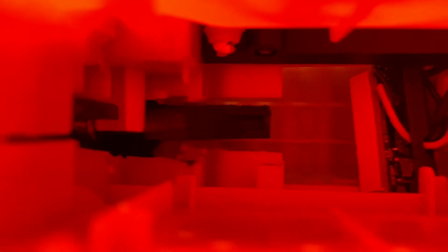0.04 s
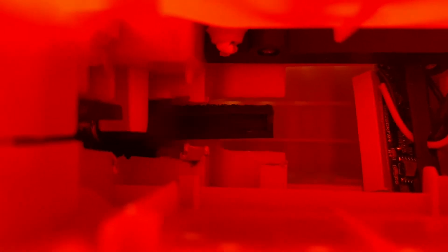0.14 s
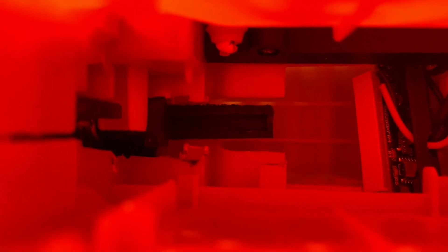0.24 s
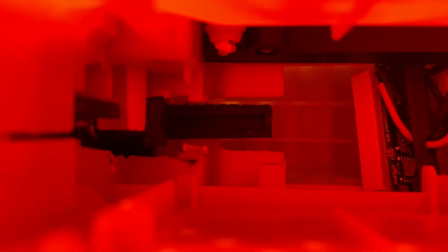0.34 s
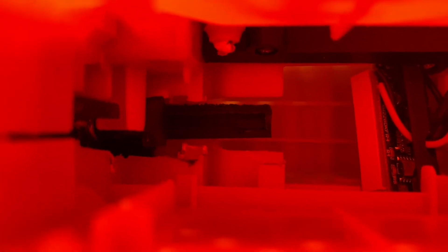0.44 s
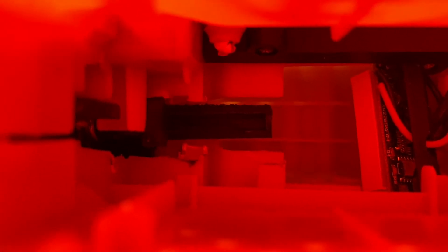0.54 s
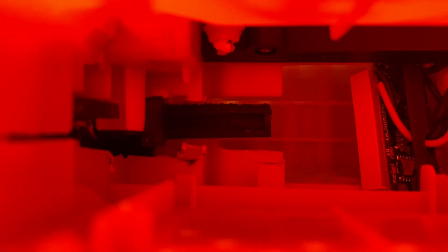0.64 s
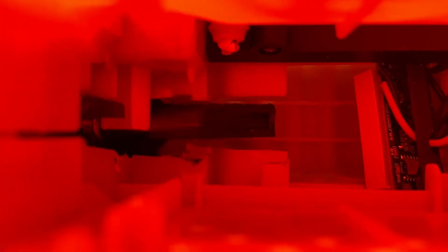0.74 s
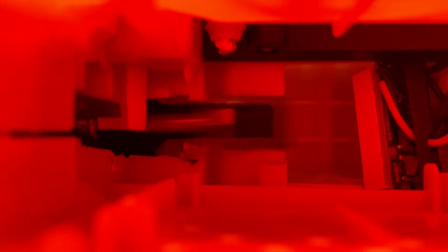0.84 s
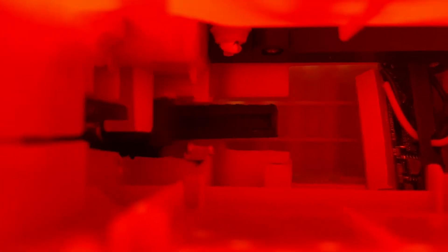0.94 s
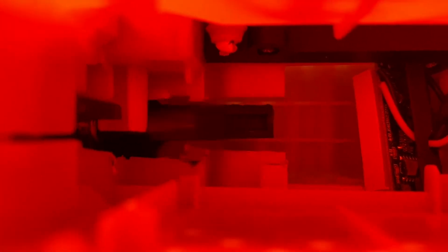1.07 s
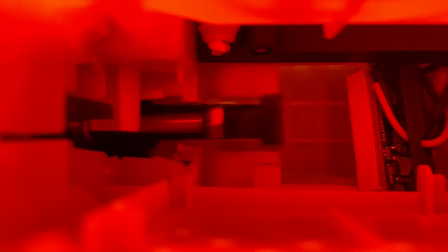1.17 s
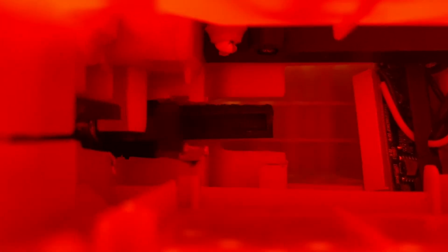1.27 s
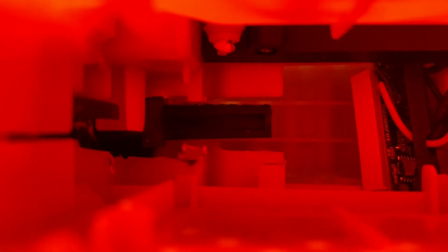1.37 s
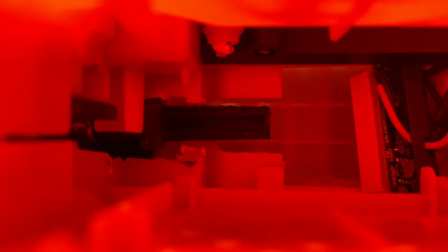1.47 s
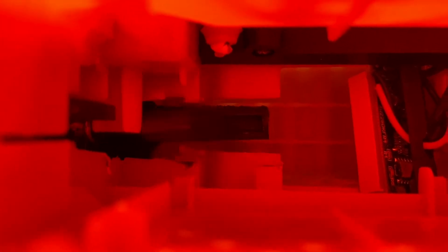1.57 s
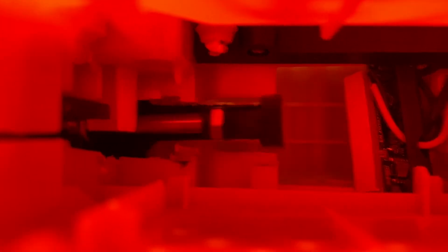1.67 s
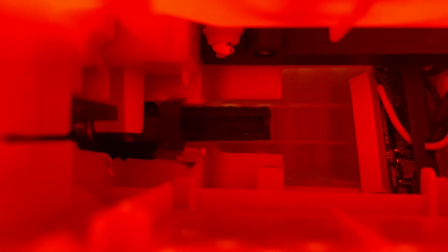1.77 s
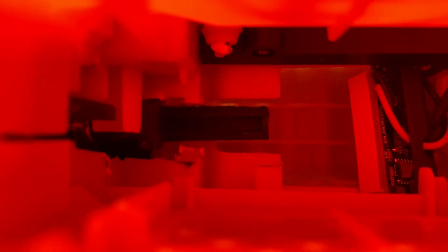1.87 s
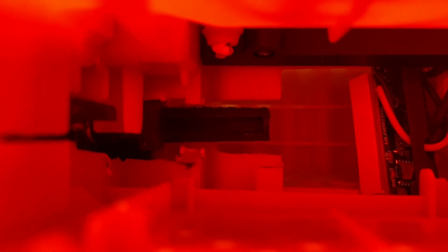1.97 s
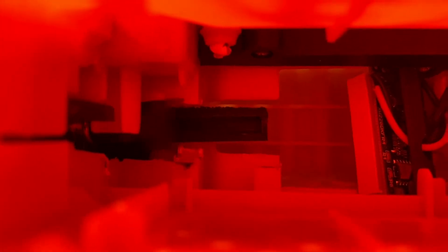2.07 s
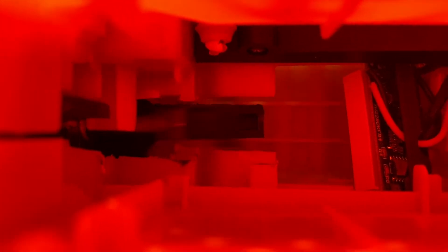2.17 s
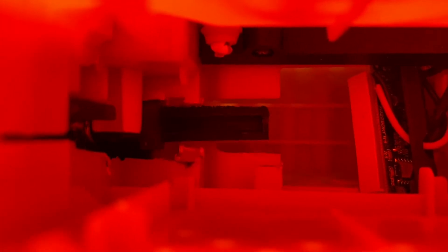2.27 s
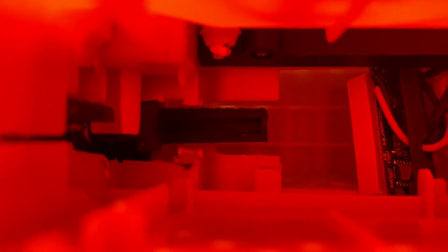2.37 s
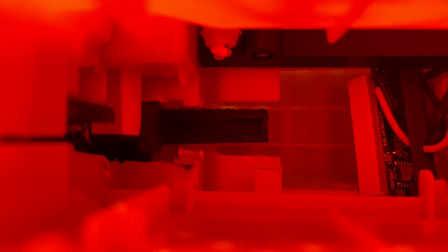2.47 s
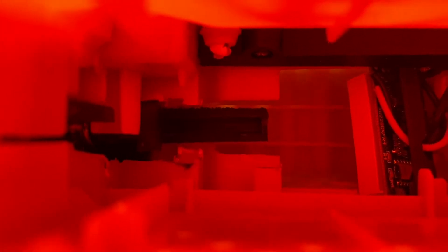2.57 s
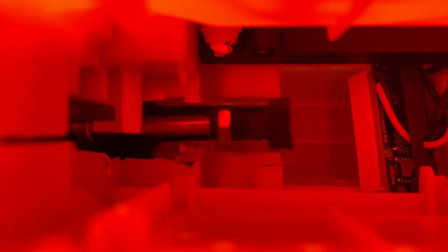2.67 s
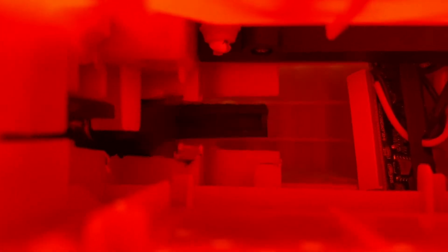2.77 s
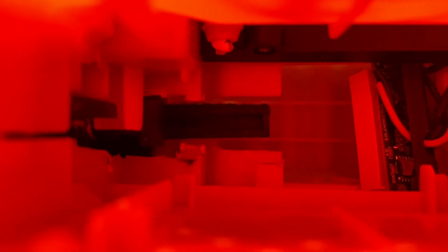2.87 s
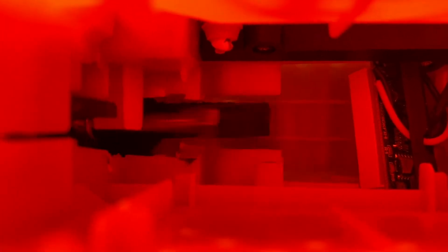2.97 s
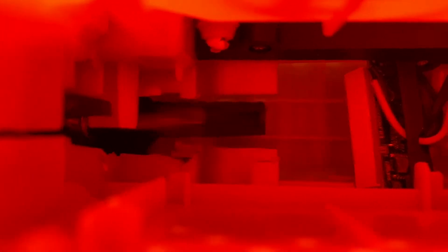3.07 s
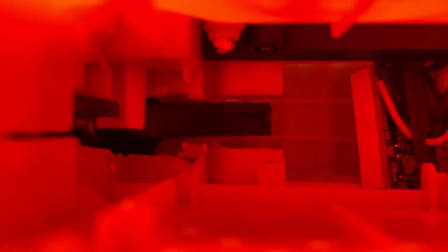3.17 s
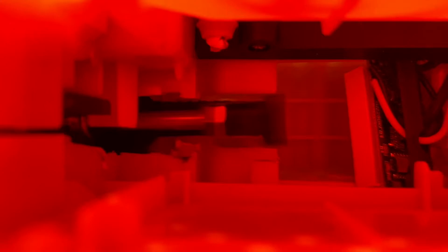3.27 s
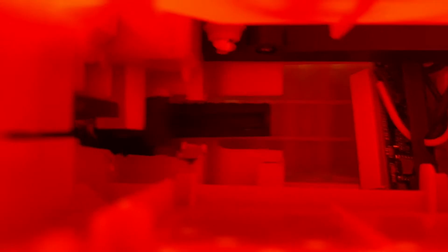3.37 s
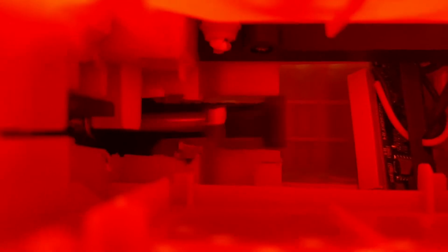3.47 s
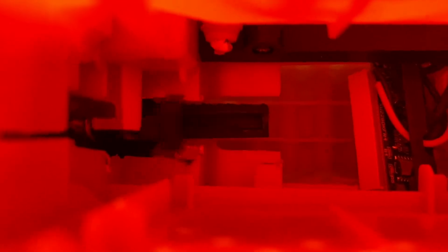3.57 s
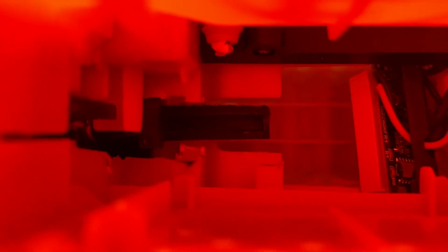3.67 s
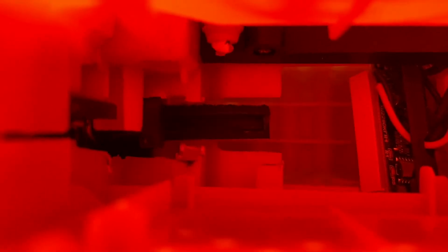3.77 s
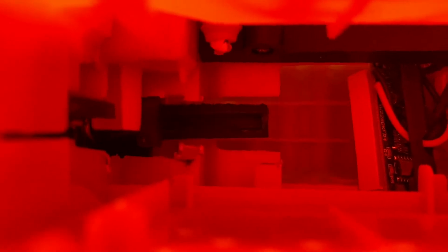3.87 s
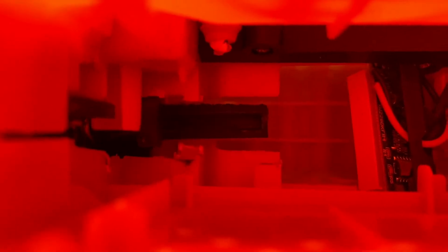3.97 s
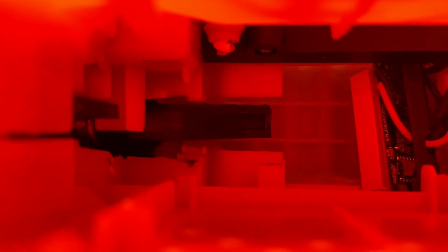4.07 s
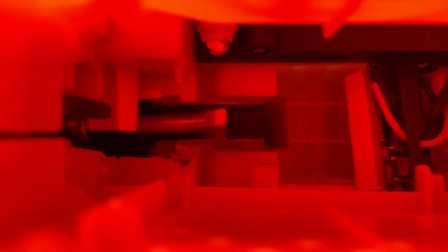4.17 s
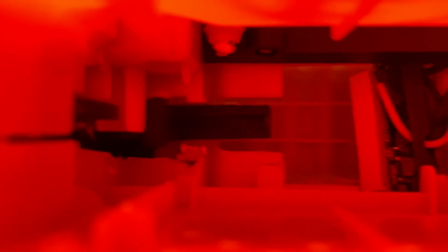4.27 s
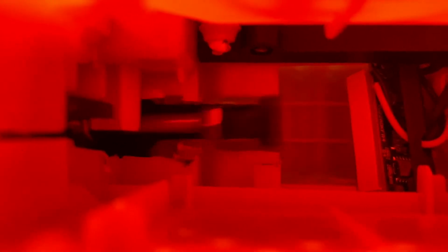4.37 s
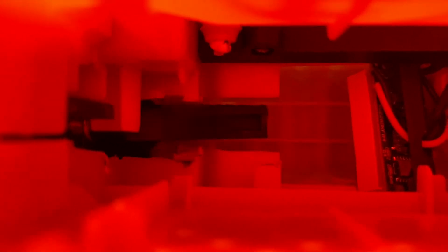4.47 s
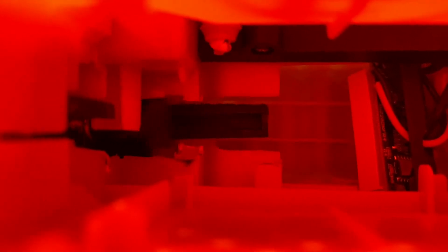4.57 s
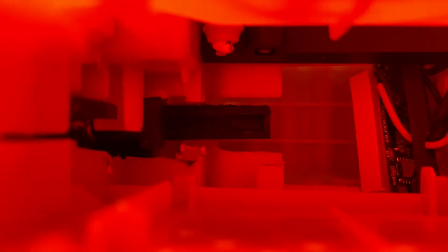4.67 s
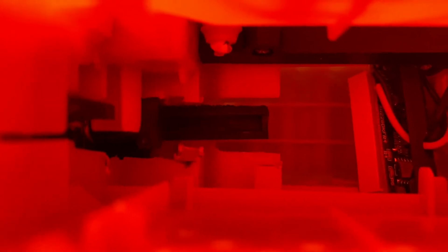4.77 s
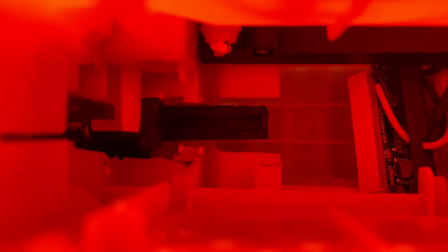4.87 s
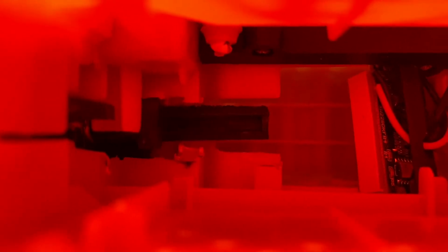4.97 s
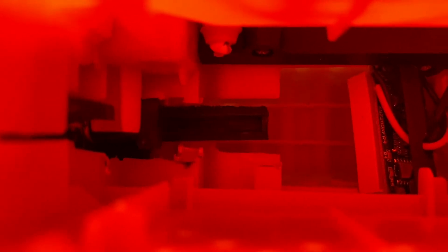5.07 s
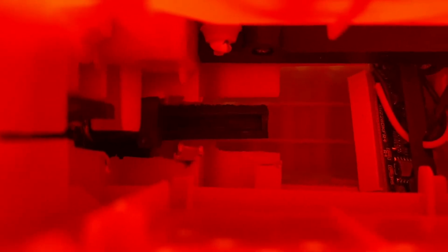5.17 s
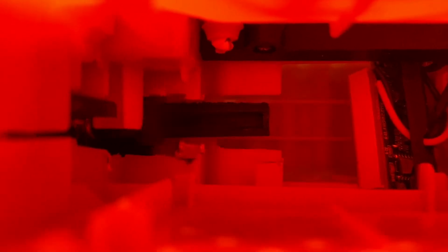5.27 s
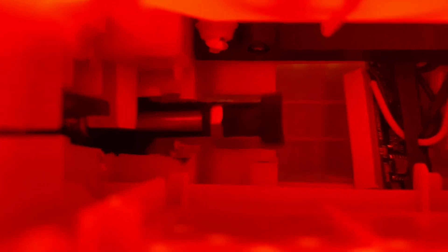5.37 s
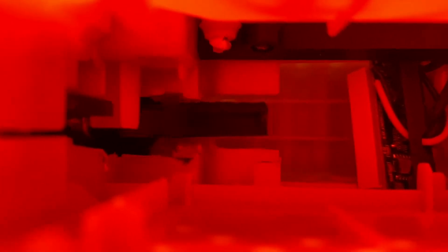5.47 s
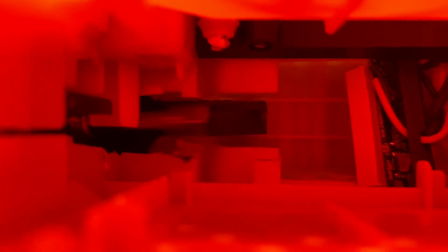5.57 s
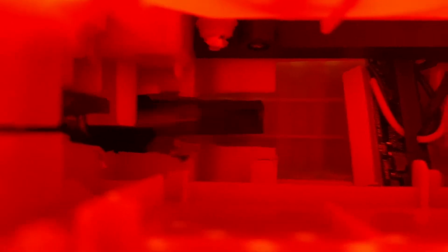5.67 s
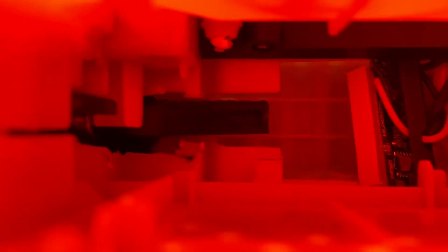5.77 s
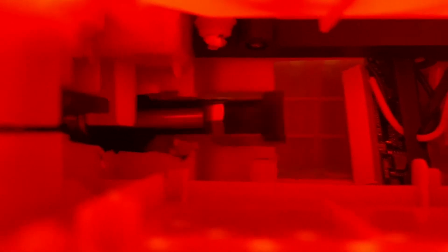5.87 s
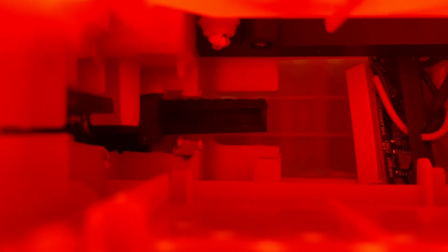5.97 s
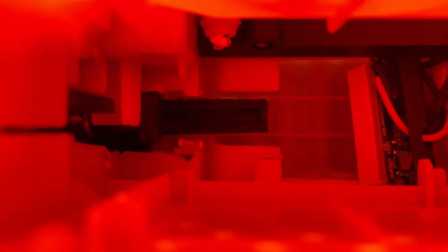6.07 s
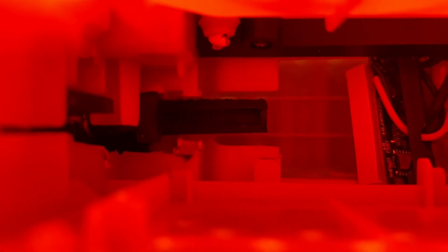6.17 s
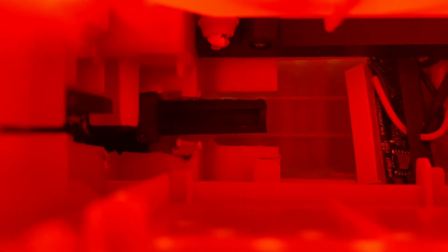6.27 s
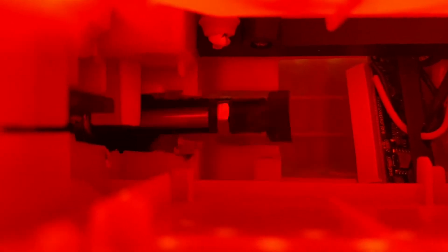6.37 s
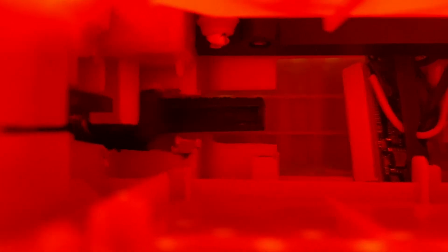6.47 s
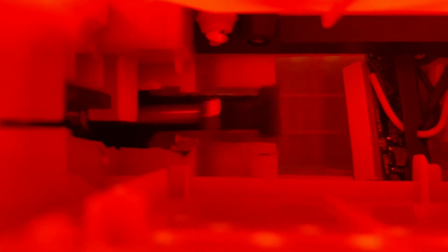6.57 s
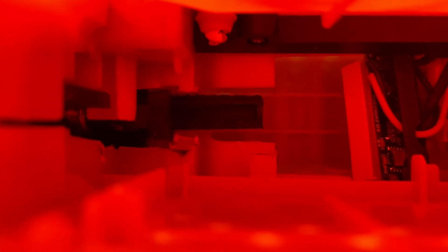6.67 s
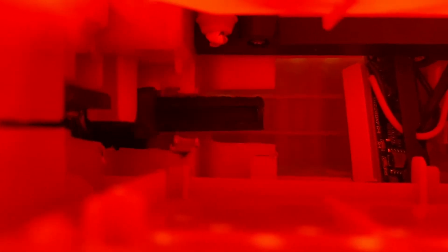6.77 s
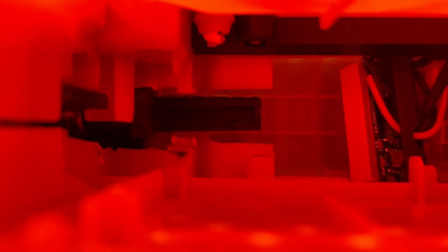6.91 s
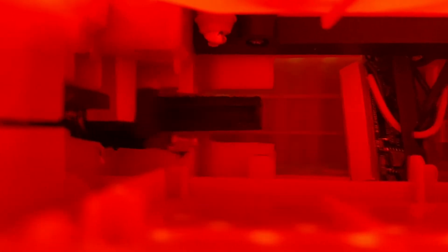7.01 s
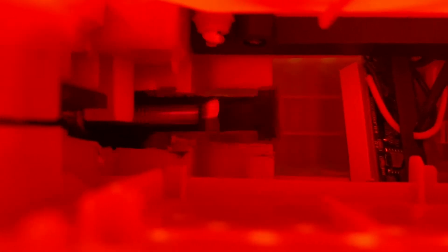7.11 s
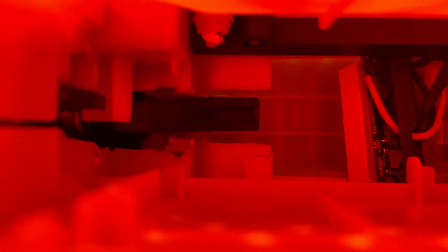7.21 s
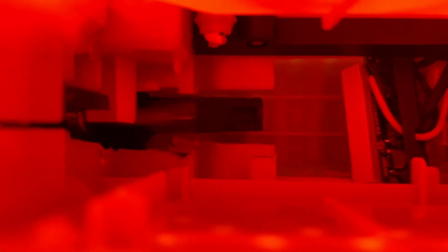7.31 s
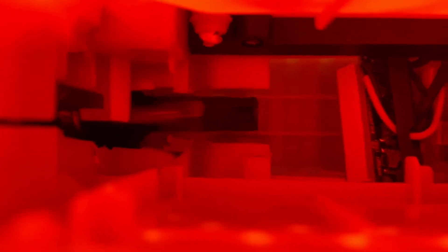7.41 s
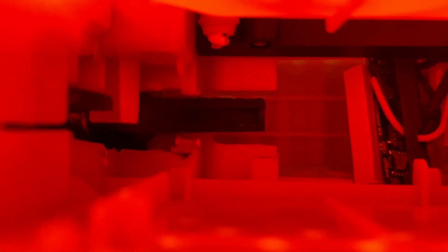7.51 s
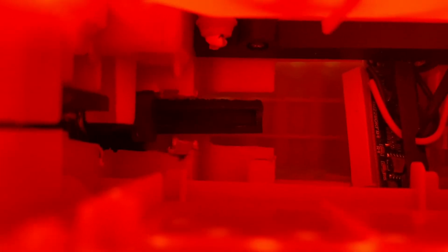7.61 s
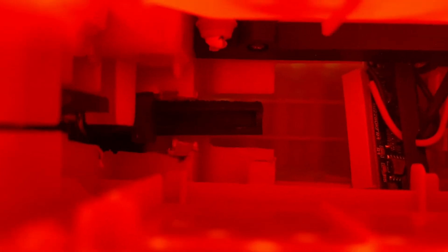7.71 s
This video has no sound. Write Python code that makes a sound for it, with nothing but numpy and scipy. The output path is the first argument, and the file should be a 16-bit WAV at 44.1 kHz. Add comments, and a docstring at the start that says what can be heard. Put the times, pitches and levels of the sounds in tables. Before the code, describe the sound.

In a small room, a toy blaster's solenoid plunger clatters right next to the microphone, slamming forward and springing back so the plastic shell rings and loose parts rattle. It starts with stuttering bursts of just a few strokes, then moves to rapid runs of about half a second. The loudest clacks distort a little. In the short pauses the trigger ticks softly and hands rumble faintly on the shell.

```python
"""A solenoid pusher hammers about 16 times a second, in short bursts, inside a toy blaster's open shell. On
each stroke the plunger scrapes forward, slams on its stop and is thrown back by its spring onto a soft bumper,
where it chatters. The hits ring the plastic shell and the spring, and shake loose parts. The trigger ticks
between bursts and hands rumble on the shell. The slams are so loud that their peaks flatten; a small room
answers."""
import sys
import numpy as np
from scipy import signal
from scipy.fft import rfft, irfft, next_fast_len
from scipy.io import wavfile

SR = 44100
rng = np.random.default_rng(int(sys.argv[2]) if len(sys.argv) > 2 else 0)


def log_audio(samples):
    """Write samples as a 16-bit WAV file to the path given in sys.argv[1]."""
    # one column per channel
    frames = np.atleast_2d(samples).T
    # limit to full scale, then quantise
    limited = np.clip(frames, -1, 1)
    pcm = np.round(limited * 32767).astype(np.int16)
    wavfile.write(sys.argv[1], SR, pcm)


N = 341525
SIZE = next_fast_len(N + SR // 3, real=True)
HZ = np.fft.rfftfreq(SIZE, 1 / SR)
T = np.arange(SR // 7) / SR  # time axis of one contact
CYCLE_S = .0633  # stroke to stroke within a burst

# Trigger pulls (event levels are relative: each layer adds its own gain):
# first slam t/s, stroke count, first cycle/s, clack/dB, thump/dB, bumper thud/dB, switch click/dB
BURSTS = [(-0.036, 2, .0845, -10, -12, -16, -50), (0.689, 4, .087, -10, -11.5, -16, -35),
          (1.081, 3, .0808, -8.5, -11, -16, -45), (1.582, 2, .0835, -9, -11, -13, -42),
          (2.094, 1, 0.085, -10.5, -11.5, -14, -38.5), (2.662, 1, 0.086, -9.5, -11, -14.5, -41.5),
          (2.932, 10, 0.084, -9, -12, -12.5, -46.5), (4.024, 8, .0845, -9.5, -11.5, -13.5, -51),
          (5.218, 11, 0.083, -9.5, -12, -14, -44), (6.354, 4, 0.083, -10, -12.5, -15, -48),
          (6.952, 9, .082, -10, -12, -13.5, -47)]


def amp(db):
    """Decibels to gain."""
    return 10 ** (np.asarray(db) / 20)


def unit(x):
    """Scale to rms 1."""
    return x / np.sqrt(np.mean(x ** 2) + 1e-20)


def along(points, hz):
    """Read a curve of (f/Hz, value) points on a log frequency axis."""
    f, v = np.transpose(points)
    return np.interp(np.log(hz + 1), np.log(f + 1), v)


def filtered(x, response):
    """Pass x through a frequency response."""
    return irfft(rfft(x, SIZE) * response, SIZE)[..., :N]


def colour(points):
    """Minimum-phase EQ through (f/Hz, level/dB) points."""
    cepstrum = irfft(np.log(amp(along(points, HZ))), SIZE)
    cepstrum[1:SIZE // 2] *= 2
    cepstrum[SIZE // 2 + 1:] = 0
    return np.exp(rfft(cepstrum))


def resonances(modes):
    """Response of a bank of damped modes, alternating in polarity."""
    return 1j * HZ * sum((-1) ** k * amp(db) * width / (hz ** 2 - HZ ** 2 + 1j * HZ * width)
                         for k, (hz, width, db) in enumerate(modes))


def add(track, s, piece):
    """Mix a piece into a track at s seconds."""
    start = int(round(s * SR))
    piece = piece[..., max(-start, 0):max(N - start, 0)]
    start = max(start, 0)
    track[..., start:start + piece.shape[-1]] += piece


def fade(attack, t60):
    """Envelope of one contact: quick rise, exponential decay."""
    return (1 - np.exp(-T / attack)) * amp(-60 * T / t60)


def settle(attack, duration):
    """Envelope of a bouncing contact: it keeps up for a while, then stops quickly."""
    return (1 - np.exp(-T / attack)) * np.exp(-(T / duration) ** 2)


def grit(count, alike, spiky_db):
    """Stereo noise of dense, uneven tiny contacts; alike is the share of power common to both sides."""
    common, left, right = rng.standard_normal((3, count))
    knots = rng.standard_normal(count // 40 + 2)
    roughness = np.interp(np.linspace(0, len(knots) - 1, count), np.arange(len(knots)), knots)
    noise = np.sqrt(alike) * common + np.sqrt(1 - alike) * np.array([left, right])
    return unit(amp(spiky_db * roughness) * noise)


def background(hold_db=-70.5, grip_rise_s=.04):
    """Hands rumble on the shell, swelling as the grip shifts, over the faint air of the room."""
    # Spectra of handling rumble and room air: f/Hz, level/dB
    rumble_eq = [(20, -13), (55, 2.5), (130, -8.5), (220, -16), (400, -32), (1000, -58), (4000, -82)]
    air_eq = [(60, -18.5), (100, 2), (300, -14.5), (430, -3), (560, -11.5), (800, -19.5), (3000, -21.5),
              (8000, -34.5), (16000, -41)]
    # Grip shifts: t/s, level/dB, low-pass f/Hz, t60/s
    grips = [(0.22, -39.5, 130, 0.28), (0.33, -40.5, 402, 0.54), (1.38, -48.5, 244, 0.29),
             (2.29, -39.5, 81, 0.2), (3.78, -52, 202, 0.34)]
    rumble = unit(filtered(grit(N, alike=.98, spiky_db=-1.5), colour(rumble_eq)))
    hands = amp(hold_db) * rumble
    for s, db, edge_hz, t60 in grips:
        since = np.arange(N) / SR - s
        rise = np.exp(-np.clip(-since / grip_rise_s, 0, 10) ** 2)
        decay = amp(db - 60 * np.clip(since / t60, 0, 2))
        hands += rise * decay * signal.lfilter(*signal.butter(2, edge_hz, fs=SR), rumble)
    air = unit(filtered(grit(N, alike=.69, spiky_db=1), colour(air_eq)))
    return hands + amp(-75) * air


def room(x, build_s=.022):
    """A small room's diffuse tail, in which each frequency dies at its own speed."""
    # Room decay: f/Hz, t60/s
    decay_times = [(70, .55), (200, .3), (430, .33), (700, .28), (2000, .33), (8000, .25), (15000, .15)]
    hz, t, spectrum = signal.stft(rng.standard_normal((2, SR * 3 // 4)), SR, nperseg=256)
    envelope = amp(-60 * t / along(decay_times, hz)[:, None]) * (1 - np.exp(-t / build_s))
    tail = signal.istft(spectrum * envelope, SR, nperseg=256)[1]
    return signal.fftconvolve(x, tail / np.linalg.norm(tail[0]), axes=1)[:, :N]


def dull_knocks(pushes):
    """Round off impulses into the soft thud of the bumper or the trigger."""
    # Force spectrum of a soft contact: f/Hz, level/dB
    thud_eq = [(30, -5.5), (160, 5), (290, -17), (400, 0.5), (570, 5), (780, -5), (1300, -5.5),
               (2500, -6.5), (6000, -33)]
    return filtered(pushes, colour(thud_eq))


def trigger(switch_lead_s=.036, switch_knock_db=-52):
    """The trigger ticks and its switch shuts just ahead of each burst: a click with a light knock."""
    # The finger works the trigger between bursts: t/s, click/dB, knock/dB
    ticks = [(0.528, -45.5, -43.5), (0.618, -53.5, -57), (3.807, -53.5, -52.5), (3.913, -56, -71),
             (3.932, -61, -69.5), (5.128, -57, -70.5), (5.15, -62, -72), (6.142, -74, -56.5),
             (6.168, -54.5, -73.5)]
    # Force spectrum of a click: f/Hz, level/dB
    click_eq = [(100, -14), (1000, -18), (2200, 1.5), (3300, 2), (5000, -1.5), (7000, -6.5), (16000, -11.5)]
    clicks, knocks = np.zeros(N), np.zeros((2, N))
    switch = [(start - switch_lead_s, db, switch_knock_db) for start, *_, db in BURSTS]
    for s, db, knock_db in ticks + switch:
        add(clicks, s, amp(db + 27) * fade(attack=.0003, t60=.035))
        add(knocks, s, amp([knock_db + 47.5]))
    return filtered(clicks * grit(N, alike=.54, spiky_db=6.5), colour(click_eq)) + dull_knocks(knocks)


def loose_parts(landings, count=4, span_s=.045, scatter_db=1):
    """Each landing shakes loose plastic parts, which click a few times at uneven moments."""
    # Force spectrum of the loose parts: f/Hz, level/dB
    plastic_eq = [(200, -8), (1200, 6), (2600, 19), (5000, 18), (7000, 13), (16000, 5)]
    clicks = np.zeros(N)
    click = fade(attack=.0001, t60=.009)
    shape = (len(landings), count)
    for (s, db), moments, sizes in zip(landings, rng.random(shape), rng.standard_normal(shape)):
        for moment, size in zip(moments, sizes):
            add(clicks, s + span_s * moment, amp(db - .5 + scatter_db * min(size, 1)) * click)
    return filtered(clicks * grit(N, alike=.9, spiky_db=0), colour(plastic_eq))


def spring_flicks(landings, lead_s=.0048, scatter_db=5):
    """Just before a landing the steel spring flicks against the plunger: a thin, very bright tick."""
    flicks = np.zeros((2, N))
    for (s, db), (jitter, size) in zip(landings, rng.standard_normal((len(landings), 2))):
        sizzle = np.diff(grit(len(T) + 2, alike=.88, spiky_db=4.5), 2)
        flick = sizzle * fade(attack=.0002, t60=.022)
        add(flicks, s - lead_s + .0007 * jitter, amp(db + 18 + scatter_db * min(size, 1)) * flick)
    return flicks


def rattle(hits, landings, rebounds, rush_s=.028, rush_t60=.1):
    """The plunger scrapes faster and faster towards the stop, slides back and chatters on landing."""
    # Force spectrum of the scrape: f/Hz, level/dB
    scrape_eq = [(40, -4), (200, -0.5), (500, 1), (1000, -2), (2000, 4), (5000, -2), (8000, 1.5),
                 (11000, 2.5), (16000, -5)]
    power = np.zeros(N)

    def scrape(s, db, envelope):
        """Overlapping scrapes add in power."""
        add(power, s, (amp(db) * envelope) ** 2)

    time_left = T[T < rush_s][::-1]
    rush = amp(-60 * time_left / rush_t60) * np.sqrt(1 - time_left / rush_s)
    graze = fade(attack=.0001, t60=.014)  # the loose plunger grazes its guide, out and back
    for (s, db, _), (jitter, size) in zip(hits, rng.standard_normal((len(hits), 2))):
        scrape(s - rush_s, db + 7.5, rush)
        scrape(s - .0076 + .00082 * jitter, db + 13 + 2.5 * size, graze)
        scrape(s + .0053, db + 1, settle(attack=.0042, duration=.057))  # slide back
    for (s, db), (jitter, size) in zip(landings, rng.standard_normal((len(landings), 2))):
        scrape(s, db + 12.5, settle(attack=.00073, duration=.037))  # chatter
        scrape(s - .0018 + .0011 * jitter, db + 19.5 + 3.5 * size, graze)
        scrape(s + .00056, db + 17.5, settle(attack=.0003, duration=.0041))  # crunch of the landing
    for s, db, _ in rebounds:
        scrape(s, db + 11.5, settle(attack=.0015, duration=.017))
    return filtered(np.sqrt(power) * grit(N, alike=.7, spiky_db=4.5), colour(scrape_eq))


def bumper(landings, rebounds):
    """The bumper takes the returning plunger with one dull push, and lighter ones as it rebounds."""
    pushes = np.zeros((2, N))
    for s, db in landings:
        add(pushes, s, amp([db + 48]))
    for s, _, db in rebounds:
        add(pushes, s, amp([db + 47.5]))
    return dull_knocks(pushes)


def body_ring(force):
    """Every contact rings the same plastic shell and steel spring."""
    # Modes of shell and mechanism, and the thin ring of the spring: f/Hz, width/Hz, level/dB
    shell_modes = [(48, 25, -15.5), (73, 22, -9), (167, 38, -8.5), (204.4, 62, -7), (365.5, 75.7, 0),
                   (455, 35, -4.5), (490, 42, -18), (547.4, 30, 1), (728.3, 79.6, -0.5), (1094, 72, -7),
                   (1251, 126, -6), (1444, 50, -5.5), (1546, 120, -8.5), (1990, 69, -29.5),
                   (2310, 750, -21), (2950, 380, -13.5), (3448, 220, -11.5), (4400, 110, -10),
                   (4842, 288, -12.5), (6210, 150, -21.5), (6100, 44, -34.5), (7230, 790, -19.5),
                   (6574, 100, -31.5), (7820, 410, -17), (9000, 43, -19), (9580, 180, -22),
                   (11076, 560, -22), (13260, 190, -21.5), (14100, 180, -26), (14220, 1400, -29)]
    spring_modes = [(5880, 24, -25), (7080, 20, -22), (7960, 12, -23), (12100, 30, -27)]
    return filtered(force, resonances(shell_modes) + resonances(spring_modes))


def falling_knock(high_hz, low_hz, glide_s, t60):
    """A knock in the plastic that glides down in pitch as it rings: it starts high and sinks lower."""
    hz = low_hz + (high_hz - low_hz) * np.exp(-T / glide_s)
    return np.sin(2 * np.pi * np.cumsum(hz) / SR) * fade(attack=.00028, t60=t60)


def wall_flex(hits, landings, slam_lag_s=.003733):
    """Slams and returns both flex the wall of the shell, nearly alike on every stroke."""
    wall = np.zeros(N)
    for (s, _, db), stretch in zip(hits, rng.normal(1, .025, len(hits))):
        knock = falling_knock(high_hz=620 * stretch, low_hz=257, glide_s=.0034, t60=.037)
        add(wall, s + slam_lag_s, amp(db + 9) * knock)
    for (s, db), stretch in zip(landings, rng.normal(1, .02, len(landings))):
        knock = falling_knock(high_hz=760 * stretch, low_hz=328, glide_s=.005, t60=.034)
        add(wall, s, amp(db + 4.5) * knock)
    return wall


def strokes():
    """Each pull drives one long cycle from rest, then quicker ones that slowly weaken."""
    return_s, forward_s = .0338, .0285  # stop to bumper; first landing to second slam
    limp_s, jitter_s = .0007, .0004  # strokes come alternately late and early, and wander
    run_up_db, scatter_db = 1.02, .26  # the first stroke has the full run from rest
    clack_sag_db, thud_sag_db = .19, .37  # per stroke, as the coil weakens
    hits, landings, last_landings = [], [], []
    for start, count, first_cycle, clack_db, thump_db, thud_db, _ in BURSTS:
        for k, chance in enumerate(rng.standard_normal((int(count), 5))):
            if k == 0:
                slam, landing = start, start + first_cycle - forward_s
                force_db = run_up_db
            else:
                beat = start + first_cycle + (k - 1) * CYCLE_S
                limp = limp_s * (-1) ** k
                slam = beat - limp + jitter_s * chance[3]
                landing = beat + return_s + limp / 2 + jitter_s * chance[4]
                force_db = -clack_sag_db * (k - 1)
            scatter = scatter_db * chance
            hits.append((slam, clack_db + force_db - scatter[0], thump_db - scatter[1]))
            landings.append((landing, thud_db - thud_sag_db * k - scatter[2]))
        last_landings.append(landings[-1])
    return hits, landings, last_landings


def plunger_motion(bounce_above_db=-23):
    """Cue hits (t/s, clack/dB, thump/dB), landings (t/s, thud/dB), rebounds (t/s, clatter/dB, knock/dB)."""
    # The trigger is let go in mid-stroke and the plunger only taps the stop:
    # t/s, clack/dB, thump/dB, fall-back time/s, landing/dB
    half_strokes = [(0.145, -27.5, -32, .052, -27), (1.694, -16, -20, .057, -16.5),
                    (2.197, -16.5, -24, .061, -30.5), (2.767, -14, -23.5, .063, -31.5),
                    (6.646, -14, -25.5, .046, -30.5)]
    # Two rebounds, relative to the last landing: delay/s, clatter/dB, knock/dB
    settling = [(.043, -4, -15.5), (.063, -7, -19)]
    hits, landings, last_landings = strokes()
    rebounds = []
    for rest, rest_db in last_landings:
        for s, clack_db, thump_db, fall, landing_db in half_strokes:
            if abs(s - rest) < 2 * CYCLE_S:  # this burst ends on a half stroke
                rest, rest_db = s + fall, landing_db
                hits.append((s, clack_db, thump_db))
                rebounds.append((s + .01, clack_db + .5, thump_db - 4.5))  # unseated, it chatters
                if rest_db > bounce_above_db:
                    landings.append((rest, rest_db))
        if rest_db > bounce_above_db:  # a hard landing bounces on; a gentle one clatters once
            for delay, clatter_db, knock_db in settling:
                rebounds.append((rest + delay, rest_db + clatter_db, rest_db + knock_db))
        else:
            rebounds.append((rest, rest_db, rest_db))
    return hits, landings, rebounds


def slams(hits, repeat_share=.78):
    """Steel clacks on the stop, seats with a snap and bounces once; the whole shell takes the thump."""
    # Force spectra of the steel clack and the shell thump: f/Hz, level/dB
    clack_eq = [(40, -22), (200, -13), (600, -7.5), (1500, 0), (4000, 2), (8000, -1.5), (16000, 1.5)]
    thump_eq = [(30, -1), (100, 2.5), (300, 3.5), (750, 3.5), (1300, 0), (2500, -15.5), (6000, -38)]
    snap_lag_s, thump_lag_s, bounce_lag_s, rebound_lag_s = .0021, .004221, .0073, .0072
    clacks, thumps = np.zeros((2, N)), np.zeros((2, N))
    faces = grit(len(T), alike=.52, spiky_db=-3.5)  # the same faces meet on every stroke
    chatter = settle(attack=.0002, duration=.0078)  # the coil holds them together until they settle
    for (s, clack_db, thump_db), chance in zip(hits, rng.standard_normal((len(hits), 4))):
        bounce_jitter, bounce_db, thump_jitter, snap_jitter = chance
        fresh = grit(len(T), alike=1, spiky_db=2.5)
        contact = np.sqrt(repeat_share) * faces + np.sqrt(1 - repeat_share) * fresh
        add(clacks, s, amp(clack_db + 24.5) * chatter * contact)
        treble = np.diff(grit(len(T) + 1, alike=.95, spiky_db=-6))  # a hard contact is bright
        snap = treble * fade(attack=.000067, t60=.025)
        add(clacks, s + snap_lag_s + .00014 * snap_jitter, amp(clack_db + 27) * snap)
        bounce = grit(len(T), alike=.98, spiky_db=5.5) * fade(attack=.00022, t60=.04)
        add(clacks, s + bounce_lag_s + .0012 * bounce_jitter, amp(clack_db + 19 + bounce_db) * bounce)
        add(thumps, s + thump_lag_s + .0003 * thump_jitter, amp([thump_db + 43]))
        add(thumps, s + rebound_lag_s + .00044 * bounce_jitter, amp([thump_db + 38.5]))
    return filtered(clacks, colour(clack_eq)) + filtered(thumps, colour(thump_eq))


def scene():
    """The blaster, close up at the microphone's two ports, with a little room and handling noise."""
    # Stereo balance of the shell: f/Hz, right minus left/dB
    balance = [(100, -1), (450, -3), (560, -0.5), (740, -5.5), (950, 4), (1270, -7.5), (1420, -18.5),
               (1900, -6.5), (3000, -13), (3800, -7.5), (5000, -9), (5900, -11.5), (6400, -1), (16000, 0.5)]
    # Phase between the ports: f/Hz, left lead/rad
    left_lead = [(120, 0), (230, 1), (450, 1), (800, 3), (1100, 4.4), (1550, 6.5), (7300, 6.2), (9000, 3.1),
                 (10400, .3), (11700, -.2), (13200, -3.1), (15000, -6.3)]
    hits, landings, rebounds = plunger_motion()
    force = slams(hits) + bumper(landings, rebounds) + rattle(hits, landings, rebounds)
    force += spring_flicks(landings) + loose_parts(landings) + trigger()
    blaster = body_ring(force) + wall_flex(hits, landings)
    half_turn = np.exp(.5j * along(left_lead, HZ))
    ports = np.array([half_turn, amp(along(balance, HZ)) / half_turn])
    near = filtered(blaster, ports)
    return near + amp(-27.5) * room(near) + background()


def record(dry, ceiling=1.7, top_hz=15900):
    """The slams flatten in a soft clipper; a steep low-pass cuts off the very top."""
    clipped = dry / (1 + np.abs(dry / ceiling) ** 8) ** (1 / 8)
    return filtered(clipped, 1 / (1 + (HZ / top_hz) ** 160))


dry = scene()
out = record(dry)
log_audio(out)
```